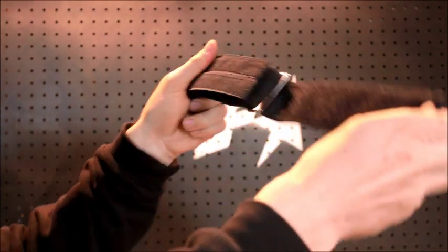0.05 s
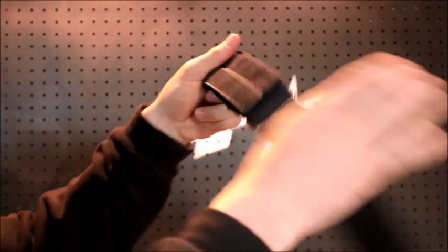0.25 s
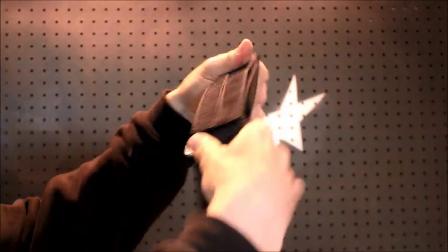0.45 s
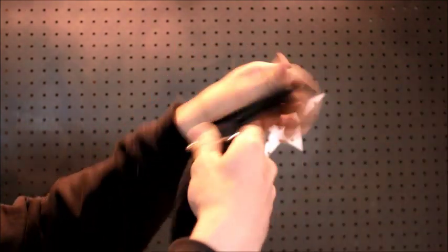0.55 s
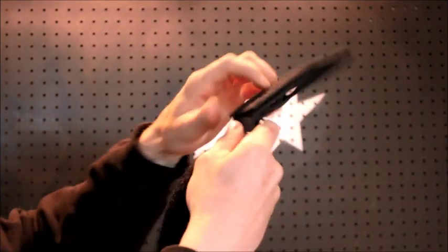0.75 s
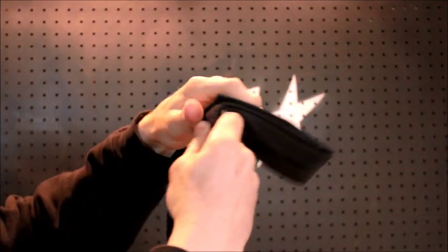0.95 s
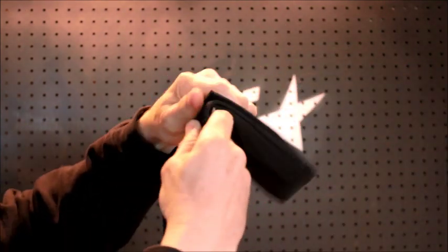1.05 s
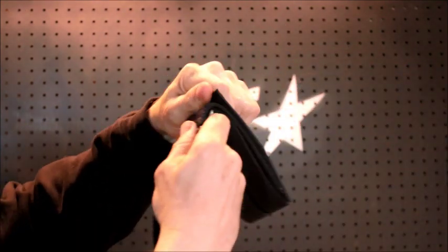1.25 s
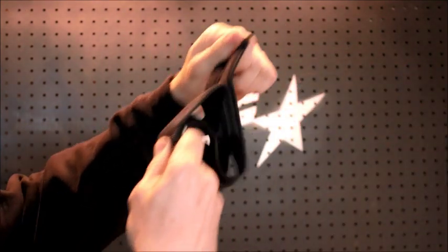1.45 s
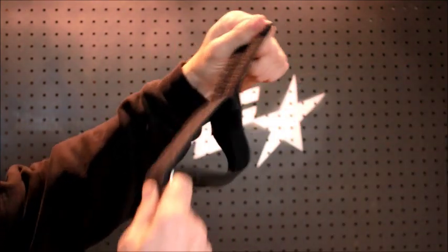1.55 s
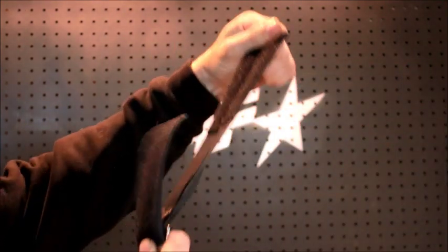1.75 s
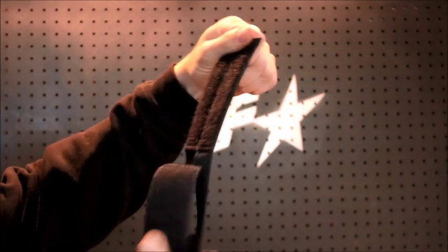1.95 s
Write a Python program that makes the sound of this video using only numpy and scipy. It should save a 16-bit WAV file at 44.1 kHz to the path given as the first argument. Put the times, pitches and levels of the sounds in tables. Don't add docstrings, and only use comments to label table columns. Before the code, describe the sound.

A hook-and-loop strap tears open, heard close in a small, hard room. The echo of an earlier rip dies away at the start. Soft rubbing and sparse ticks come from about 0.5 seconds, sharper picking snaps from 0.9, rough jerks from 1.22, then a dense, bright, surging rip from 1.34 to 1.76. A brief tail fades; faint low motor hum swells mid-way, then sinks.

```python
import sys
import numpy as np
from scipy import signal
from scipy.fft import rfft, irfft
from scipy.io import wavfile
from scipy.ndimage import uniform_filter1d

SR = 44100
rng = np.random.default_rng(int(sys.argv[2]) if len(sys.argv) > 2 else 0)


def wav_record(signal):
    frames = np.transpose(np.atleast_2d(signal))
    bounded = np.clip(frames, -1, 1)
    quanta = np.round(bounded * 32767).astype(np.int16)
    wavfile.write(sys.argv[1], SR, quanta)


def gain_from_db(level_db):
    decades = np.asarray(level_db, float) / 20
    return 10 ** decades


N = 88508
LEAD = 20000


# time in seconds, level in dB, brightness in dB (up for highs, down for lows).
RIP = [
    (1.343, -26, 0.1),
    (1.53, -22, 0.072),
    (1.542, -20.5, 0.072),
    (1.615, -23.5, 0.055),
    (1.622, -27.5, 0.089),
    (1.697, -24.5, 0.1),
    (1.703, -24.5, 1),
    (1.74, -25.5, 0.16),
    (1.761, -48, 0.1),
]
# frequency in Hz, level in dB per Hz.
TAPE = [(150, -42), (250, -25.5), (468, -18.5), (723, -19), (1350, -10), (1950, -6), (4570, -1.5),
        (13000, -6), (16000, -9)]


def rip():
    earlier = [(-.4, -21.5, 0), (.0019, -21.5, 0)]
    return crackle([earlier, RIP], TAPE, per_s=6000, spread_db=3.6, hiss_db=-7, cycles=6, clump_db=.6)


# time in seconds, level in dB, brightness in dB.
JERKS = [
    (1.223, -33, -1),
    (1.24, -28, 0),
    (1.263, -40, 0),
    (1.2655, -24, 0),
    (1.275, -21, 1),
    (1.29, -29, 0),
    (1.318, -30, 0),
    (1.325, -23, 0),
    (1.345, -26, 0),
]


def jerks():
    return crackle([JERKS], TAPE, per_s=1300, spread_db=3.5, hiss_db=-9, cycles=6, clump_db=1)


# time in seconds, level in dB, brightness in dB.
PICKING = [
    [(.905, -36, -1), (.932, -52.5, -18), (.937, -39, -7), (.95, -33.5, -6), (.975, -52, 2),
     (1.026, -57, 9), (1.031, -47, -12.5), (1.05, -59, -11)],
    [(1.057, -61, -10), (1.078, -36.5, -3), (1.084, -34.5, 2.5), (1.124, -39, -7.2), (1.129, -30.5, -1.5),
     (1.155, -39.5, -7.5), (1.196, -55, 7), (1.202, -48, -18), (1.219, -34.5, -4.5)],
]


def picking():
    return crackle(PICKING, TAPE, per_s=510, spread_db=1.5, hiss_db=-.5, cycles=2.3, clump_db=.9)


# time in seconds, peak level in dB, pitch in Hz.
SNAPS = [(0.3242, -48, 5800), (0.3479, -51, 7800), (0.4805, -38, 6500), (0.5421, -30, 4200),
         (0.5913, -32, 6300), (0.6056, -30, 9000), (0.6548, -38, 2600), (0.6829, -33, 5000),
         (0.7071, -33, 5000), (0.7986, -29, 13300), (0.8345, -30, 4000), (0.9034, -17, 5600),
         (0.9353, -20, 6100), (0.9441, -20, 4300), (0.9469, -21, 6500), (1.0279, -27, 5800),
         (1.0541, -19, 3100), (1.0707, -25, 3100), (1.0809, -18, 3200), (1.109, -19, 4300),
         (1.1278, -15, 4400), (1.1676, -19, 13100), (1.1999, -19, 4400), (1.209, -20, 3100),
         (1.2383, -7, 4700), (1.2667, -7, 6200), (1.2728, -9, 5800), (1.2854, -7, 4600), (1.3243, -7, 5000),
         (1.444, -8, 4200)]


def snaps():
    cycles, edge_db, rattle_db, rattle_s = 6, 2, -12, .0007
    out = np.zeros(N + LEAD)
    t = np.arange(400) / SR
    band = signal.butter(2, [1500, 15500], "band", fs=SR, output="sos")
    for s, db, hz in SNAPS:
        kick = gain_from_db(rattle_db) * rng.standard_normal(400) * np.exp(-t / rattle_s)
        kick[0] = 1
        snap = ring(kick, hz, cycles / hz) - gain_from_db(edge_db) * np.roll(kick, 1)
        snap = signal.sosfilt(band, snap)
        i = int(s * SR) + LEAD
        out[i:i + 400] += gain_from_db(db) * snap / np.abs(snap).max()
    return out


# time in
# seconds, level in dB, brightness in dB.
HANDLING = [
    [(.478, -61, 6), (.53, -55, -5), (.541, -47.5, 7), (.575, -47.5, -5.5), (.608, -51.5, 9.5),
     (.622, -59, 1.5), (.661, -49.5, -3)],
    [(.665, -55, -8), (.705, -49, -5.2), (.72, -52, -1), (.76, -51.5, 2.5), (.775, -42, -2),
     (.812, -44.5, 0.5), (.826, -52.5, -9), (.89, -53, 3)],
]
# frequency in Hz, level in dB per Hz.
CLOTH = [(240, -35), (400, -7.5), (964, -15.5), (1220, -9), (1400, -6.5), (4110, 0.5), (9760, -5.5),
         (13300, -2.5), (16000, -11.5)]


def handling():
    return crackle(HANDLING, CLOTH, per_s=500, spread_db=6, hiss_db=5.5, cycles=2.4, clump_db=.8)


# time in seconds, level in dB.
KNOCKS = [
    (0.029, -47),
    (.905, -38.5),
    (.946, -45.5),
    (1.489, -39),
]
# frequency in Hz, level in dB, seconds to fade by 60 dB.
KNOCK_MODES = [(335, -9.5, 0.061), (464, -9, 0.042), (665, -3.9, 0.1), (878, -2.5, 0.035),
               (1233, -0.3, 0.046)]


def knocks():
    s, db = np.transpose(KNOCKS)
    luck_db = rng.normal(0, 1.67, (len(s), len(KNOCK_MODES)))
    out = 0
    for k, (hz, level_db, t60) in enumerate(KNOCK_MODES):
        clicks = np.zeros(N + LEAD)
        clicks[(s * SR).astype(int) + LEAD] = gain_from_db(db + level_db + luck_db[:, k]) * (-1) ** k
        out = out + ring(clicks, hz, t60)
    return out


# time in seconds, boost in dB.
SURGES = [(.568, 4), (1.229, 6), (1.272, 3), (1.313, 2), (1.328, 3.5), (1.345, 0), (1.376, 3.5),
          (1.454, 4.5), (1.502, 2.5), (1.549, 3), (1.6, 4.5), (1.647, 6), (1.685, 1.5), (1.718, 6),
          (1.734, 7)]


def surge(x):
    surge_s = .009
    t = (np.arange(len(x)) - LEAD) / SR
    swell_db = sum(db * np.exp(-((t - s) / surge_s) ** 2) for s, db in SURGES)
    middle = signal.sosfilt(signal.butter(1, [3000, 8000], "band", fs=SR, output="sos"), x)
    return x + (gain_from_db(swell_db) - 1) * middle


def crackle(moves, spectrum, per_s, spread_db, hiss_db, cycles, clump_db):
    n, silent_db = N + LEAD, -120
    rows = []
    for move in moves:
        rows += [(move[0][0] - .002, silent_db, 0), *move, (move[-1][0] + .002, silent_db, 0)]
    clump = drift(90)
    sizes = gain_from_db(spread_db * np.minimum(rng.exponential(1, n), 3.5)) * rng.choice([-1, 1], n)
    slips = sizes * (rng.random(n) < per_s * gain_from_db(2 * clump) / SR)
    dealt = rng.integers(0, 18, n)
    rings = 0
    for k, hz in enumerate(np.geomspace(2000, 15000, 18)):
        rings = rings + ring(slips * (dealt == k), hz, cycles / hz)
    hiss = gain_from_db(hiss_db) * rng.standard_normal(n)
    x = coloured(rms_one(rings) + hiss, spectrum)
    low = signal.sosfilt(signal.butter(1, 4000, fs=SR, output="sos"), x)
    tilt = gain_from_db(in_time(rows, 2))
    return gain_from_db(in_time(rows, 1) + clump_db * clump) * (low / tilt + (x - low) * tilt)


def ring(clicks, hz, t60):
    r, w = gain_from_db(-60 / (t60 * SR)), 2 * np.pi * hz / SR
    return signal.lfilter([0, np.sin(w)], [1, -2 * r * np.cos(w), r * r], clicks + 1e-18)


def drift(rate):
    r = np.exp(-2 * np.pi * rate / SR)
    return rms_one(signal.lfilter([1], [1, -2 * r, r * r], rng.standard_normal(N + LEAD)))


def coloured(x, spectrum):
    bins = rfft(x)
    hz = np.maximum(np.arange(len(bins)) * SR / len(x), 1)
    own = np.sqrt(uniform_filter1d(np.abs(bins) ** 2, size=1500))
    return rms_one(irfft(bins / own * gain_from_db(at_hz(spectrum, hz)), len(x)))


def rms_one(x):
    return x / np.sqrt(np.mean(x ** 2) + 1e-20)


def in_time(rows, column):
    rows = np.array(rows)
    return np.interp((np.arange(N + LEAD) - LEAD) / SR, rows[:, 0], rows[:, column])


def at_hz(points, hz):
    table_hz, value = np.transpose(points)
    return np.interp(np.log(hz), np.log(table_hz), value)


# frequency in Hz, seconds to fade by 60 dB.
ROOM = [(400, 0.56), (1300, 0.52), (3500, 0.47), (9000, 0.33), (15000, 0.26)]


def room(x):
    room_db, first_echo_s = -9, .0018
    t = np.arange(SR // 2) / SR
    edges = 200 * 2 ** np.arange(0, 6.6, .5)
    tail = 0
    for low, high in zip(edges, edges[1:]):
        sos = signal.butter(2, [low, high], "band", fs=SR, output="sos")
        band = signal.sosfilt(sos, rng.standard_normal(len(t)))
        tail = tail + band * gain_from_db(-60 * t / at_hz(ROOM, np.sqrt(low * high)))
    tail = tail * np.clip(t / first_echo_s - 1, 0, 1)
    tail = tail / np.sqrt(np.sum(tail ** 2))
    return gain_from_db(room_db) * signal.fftconvolve(x, tail)[:len(x)]


# multiple of its turning rate, level in dB.
ORDERS_A = [(2.0, -11), (3.0, -7.5), (4.0, -8), (5.0, 5.5), (6.0, 2), (9.0, -5.5), (10.0, -14),
            (11.0, -6.5), (12.0, -16.5), (15.0, -16)]
# multiple of its turning rate, level in dB.
ORDERS_B = [(2.0, 11.5), (3.0, 0.4), (4.0, -23.5), (5.0, -21.5)]
# frequency in Hz, level in dB per Hz.
AIR = [(20, -28), (80, -21.5), (150, -12), (320, -26.5), (660, -28), (950, -33.5), (5000, -35.5),
       (15000, -40.5)]
# time in seconds, level in dB.
GAIN = [(0, -72.5), (.2, -68.5), (.6, -60), (.95, -56.5), (1.27, -59.5), (1.3, -64), (1.7, -67.5),
        (2.0, -67.5)]


def hum():
    motor_a_hz, motor_b_hz, beat_null_s, air_db = 26.52, 71.4, 1.007, 2.5
    t = (np.arange(N + LEAD) - LEAD) / SR - beat_null_s
    a = sum(gain_from_db(db) * np.cos(2 * np.pi * round(k) * motor_a_hz * t + k * (k - 5)) for k, db in ORDERS_A)
    b = sum(gain_from_db(db) * np.cos(2 * np.pi * round(k) * motor_b_hz * t + k - 2) for k, db in ORDERS_B)
    air = gain_from_db(air_db) * coloured(rng.standard_normal(len(t)), AIR)
    return gain_from_db(in_time(GAIN, 1)) * (np.sqrt(2) * (a - b) + air)


def scene():
    strap = surge(handling() + picking() + jerks() + rip() + snaps() + knocks())
    return (strap + room(strap) + hum())[None, LEAD:]


def band_limit(x):
    return signal.sosfilt(signal.butter(12, 16880, fs=SR, output="sos"), x)


def record(dry):
    rounded = .8 * np.tanh(dry / .8)
    cut = signal.sosfilt(signal.ellip(8, .5, 45, 15800, fs=SR, output="sos"), rounded)
    return band_limit(cut)


dry = scene()
out = record(dry)
wav_record(out)
```